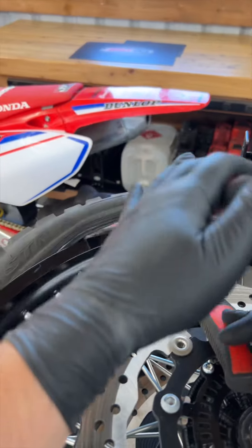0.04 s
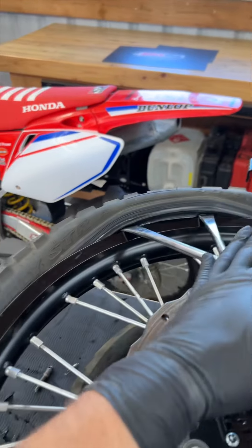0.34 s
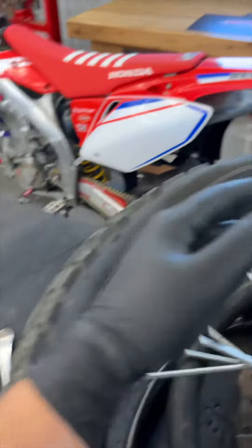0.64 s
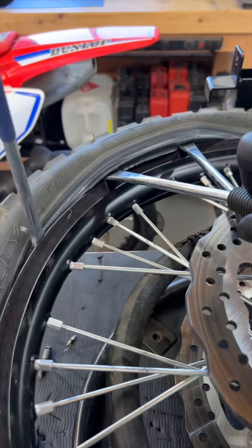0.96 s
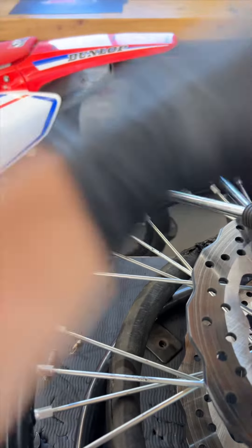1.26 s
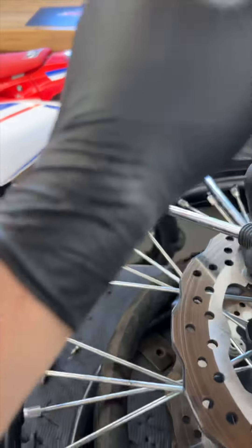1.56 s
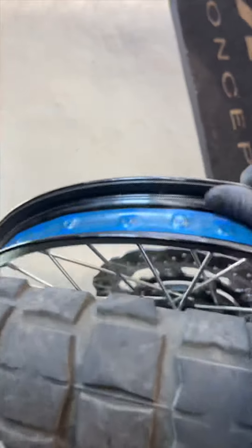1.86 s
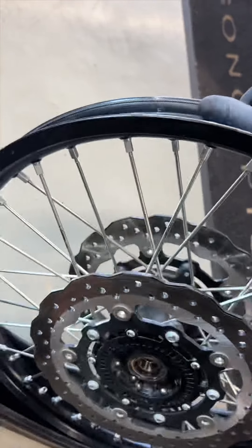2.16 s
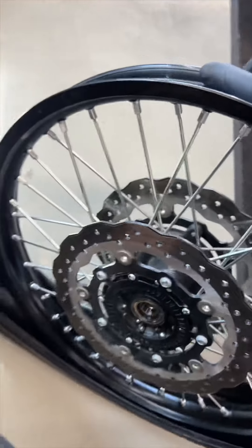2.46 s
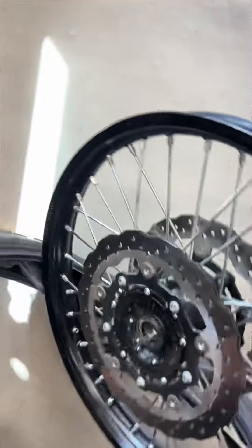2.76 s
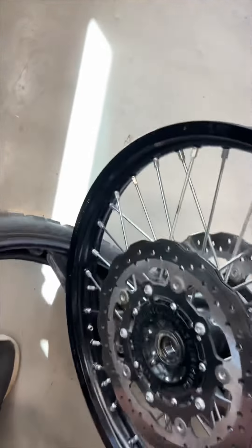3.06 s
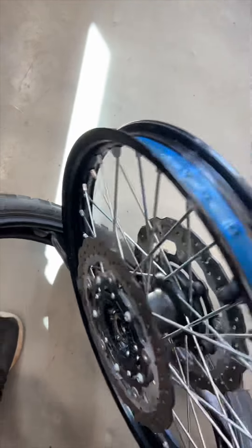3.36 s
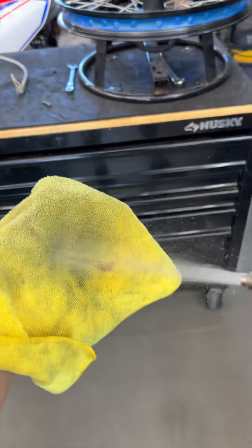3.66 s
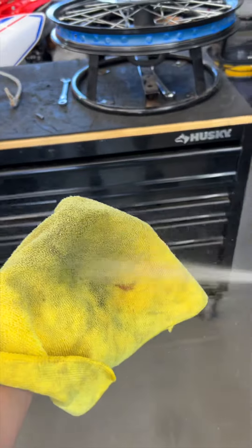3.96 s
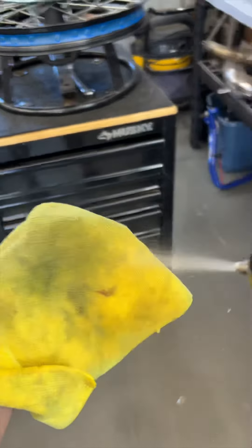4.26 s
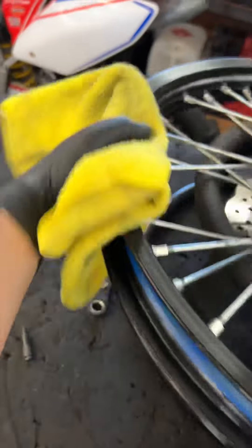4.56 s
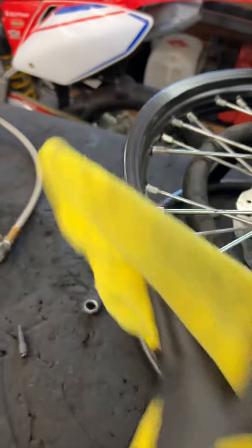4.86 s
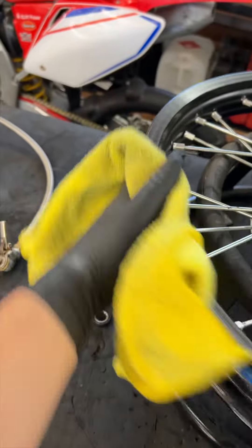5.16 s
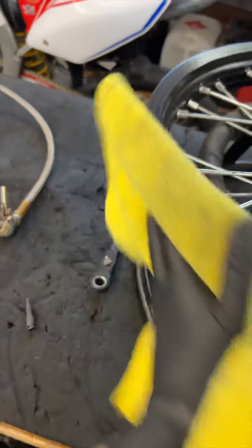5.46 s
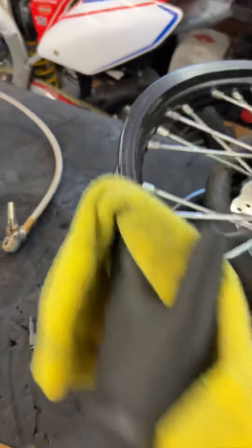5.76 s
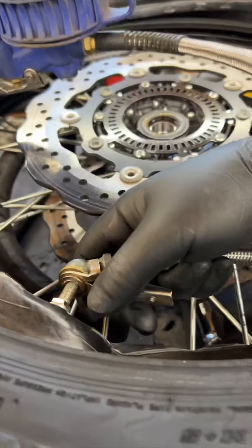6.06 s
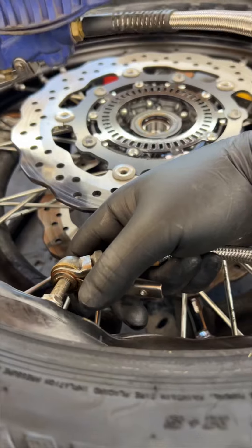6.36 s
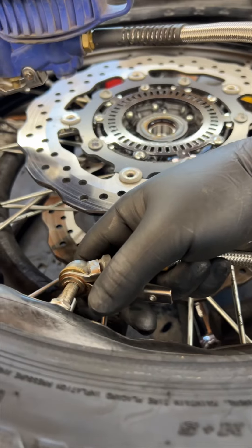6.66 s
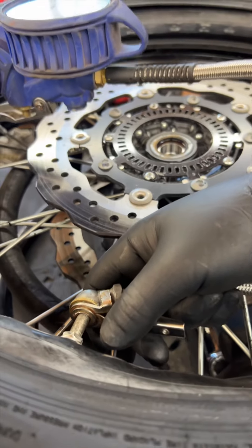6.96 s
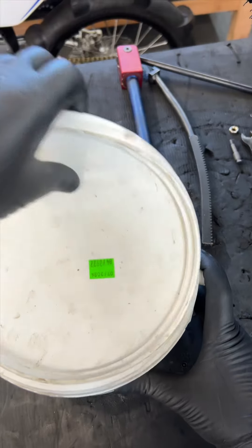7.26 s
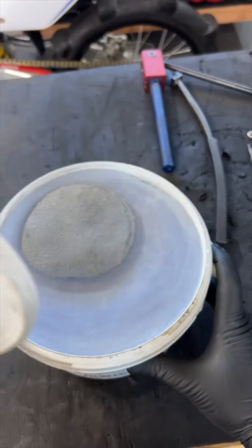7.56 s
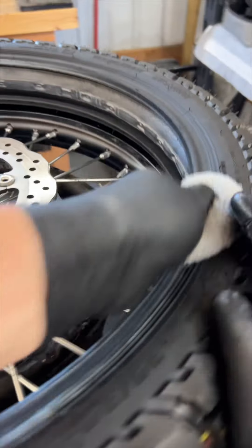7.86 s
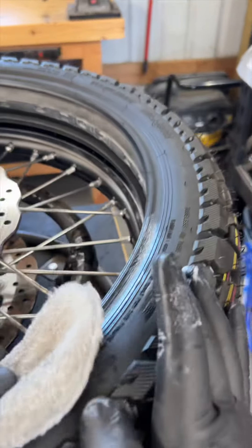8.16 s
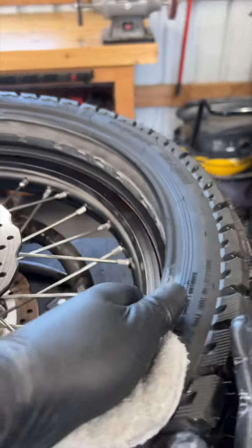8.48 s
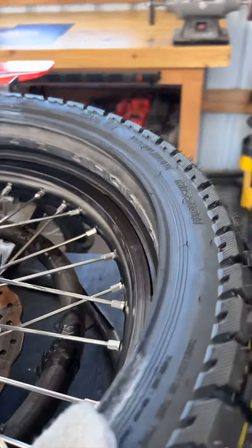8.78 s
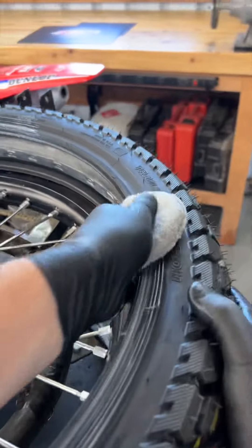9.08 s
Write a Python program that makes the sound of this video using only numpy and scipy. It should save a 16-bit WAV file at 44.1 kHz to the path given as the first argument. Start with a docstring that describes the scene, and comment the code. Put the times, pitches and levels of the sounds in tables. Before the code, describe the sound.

Steel levers clink on a spoked wheel and rubber rubs, then a can sprays, air spits twice and a plastic lid snaps off.

```python
"""Steel levers clink on a spoked wheel as a motorcycle tyre is changed by hand, close to the microphone
in a workshop. The tyre rubs, judders and slaps off the rim; a can sprays a rag that squeaks round the rim.
An air chuck leaks and spits twice, a plastic lid snaps off a tub, and a pad spreads paste round the new
tyre. Bench and floor throw back short echoes, and handling rumbles in the microphone underneath."""
import sys
import numpy as np
from scipy import signal
from scipy.fft import rfft, irfft
from scipy.io import wavfile
from scipy.ndimage import map_coordinates

SR = 44100
rng = np.random.default_rng(int(sys.argv[2]) if len(sys.argv) > 2 else 0)


def wav_record(signal):
    """Record a signal, one row per channel, as 16-bit PCM in the file named by sys.argv[1]."""
    frames = np.transpose(np.atleast_2d(signal))
    bounded = np.clip(frames, -1, 1)
    # unit amplitude maps onto the largest positive 16-bit level
    quanta = np.round(bounded * 32767).astype(np.int16)
    wavfile.write(sys.argv[1], SR, quanta)


N = 402191
TIME = np.arange(N) / SR

# Modes of the brake disc, the spoked wheel and the rag-damped rim: (frequency [Hz], level [dB], t60 [s])
DISC_MODES = [(290, -23, .4), (1464, -17, .24), (1830, -12, .2), (2110, -12, .36), (2380, -13, .36),
              (2821, -10, .2), (3052, -9, .2), (4081, -7, .17), (4393, -14, .25), (5179, 0, .16),
              (5475, -8, .2), (6315, -12, .2), (7311, -12, .19), (9150, -15, .18), (13500, -14, .17)]
WHEEL_MODES = [(242, -11, .8), (441, -21, .8), (818, -21, .6), (1028, -12, .7), (1615, -13, .7),
               (1680, 0, .11), (2094, -6, .28), (2358, -7, .27), (2665, -9, .35), (2789, -8, .18),
               (3252, -8, .22), (3601, -10, .2), (5195, -20, .4), (7640, -18, .13), (8242, -28, .3)]
RIM_MODES = [(1350, -3, .12), (1615, 1, .3), (1810, 1, .2), (2070, -3, .16), (2420, -6, .14),
             (2681, -5, .16), (5489, -8, .18)]
# Moving air at the microphone: (time [s], relative level [dB])
AIR_SWAY = [(0.0, -45), (1.07, -44), (1.25, -25), (1.5, -41), (1.72, -40), (1.87, -31), (2.3, -28),
            (2.48, -37), (2.87, -30), (3.22, -35), (3.6, -47), (5.87, -43), (6.4, -60), (7.4, -38),
            (7.66, -42), (7.92, -26), (8.36, -30), (9.12, -46)]


def amp(db):
    """Decibels to gain."""
    return 10 ** (np.asarray(db) / 20)


def unit_rms(x):
    """The signal scaled to an rms of one."""
    return x / np.sqrt(np.mean(x ** 2) + 1e-20)


def value_at(points, hz):
    """Points joined by straight lines on a log frequency axis."""
    f, value = np.transpose(points)
    return np.interp(np.log(hz + 1), np.log(f + 1), value)


def level(rows):
    """Gain over time from a dB curve."""
    return amp(np.interp(TIME, *np.transpose(rows)))


def add(mix, start, sound):
    """Mix a sound in at a time in seconds."""
    part = mix[round(start * SR):][:len(sound)]
    part += sound[:len(part)]


def colour(x, spectrum, size=4096):
    """Minimum-phase filter with the given spectrum."""
    gain_db = np.maximum(value_at(spectrum, abs(np.fft.fftfreq(size, 1 / SR))), -100)
    taps = np.fft.ifft(np.exp(np.conj(signal.hilbert(np.log(amp(gain_db)))))).real
    return signal.oaconvolve(x, taps[:size // 2])[:len(x)]


def band(x, hz, kind):
    """Third-order Butterworth filter."""
    return signal.sosfilt(signal.butter(3, hz, kind, fs=SR, output="sos"), x)


def wander(per_s):
    """A random drift of about unit size."""
    knots = rng.standard_normal(4096)
    return np.interp(TIME * per_s, np.arange(len(knots)), knots)


def uneven_noise(depth_db, per_s):
    """White noise whose level wavers."""
    return rng.standard_normal(N) * amp(depth_db * wander(per_s))


def gesture(start, length, attack_s, release_s, arch_db=0):
    """Gain of one movement: it swells in, gains arch_db by halfway, and dies away."""
    age = TIME - start
    off_centre = 2 * np.clip(age / length, 0, 1) - 1
    rise = .5 + .5 * np.tanh(age / attack_s)
    fade = np.exp(-np.clip((age - length) / release_s, 0, 20))
    return rise * amp(arch_db * (.5 - off_centre ** 2)) * fade


def together(gains):
    """Overlapping movements add in power."""
    return np.sqrt(sum(gain ** 2 for gain in gains))


def ring(modes):
    """Dying sines of a struck object."""
    t = TIME[:SR]
    return sum(amp(db - 60 * t / t60) * np.sin(2 * np.pi * hz * t) * rng.choice([-1, 1])
               for hz, db, t60 in modes)


def crack(decay_s, spectrum):
    """A few milliseconds of rattling contact, flat in spectrum until the body colours it."""
    t = TIME[:SR // 4]
    burst = rng.standard_normal(len(t)) * np.exp(-t / decay_s)
    rattle = irfft(np.exp(1j * np.angle(rfft(burst))), len(t))
    sound = colour(rattle * np.exp(-t / (4 * decay_s)), spectrum)
    return sound / np.linalg.norm(sound) * np.sqrt(SR / 100)  # the energy of 10 ms at unit rms


def room(x, echo_db, tail_db, echo_decay_s=.018):
    """Near echoes off the bench and floor, then the workshop's tail, whose top dies first."""
    # Reverberation of the workshop: (frequency [Hz], t60 [s])
    decay_times = [(100, .35), (500, .4), (1500, .56), (4000, .58), (8000, .47), (15000, .3)]
    taps = rng.choice([-1., 1.], SR) * (rng.random(SR) < .2) * np.minimum(TIME[:SR] / .012, 1)
    hz, t, frames = signal.stft(taps, SR, nperseg=256)
    tail = signal.istft(frames * amp(-60 * t / value_at(decay_times, hz)[:, None]), SR, nperseg=256)[1]
    t = TIME[:len(tail)]
    echoes = rng.standard_normal(len(t)) * (rng.random(len(t)) < .05)
    echoes *= (t > .005) * np.exp(-t / echo_decay_s)
    response = amp(tail_db) * tail / np.linalg.norm(tail) + amp(echo_db) * echoes / np.linalg.norm(echoes)
    return signal.fftconvolve(x, response)[:N]


def workshop_air(sway_trim_db=-2.2, room_tone_db=-82):
    """Air swaying against the microphone, over the room tone of the shop."""
    # Spectra of the moving air and the room tone: (frequency [Hz], level [dB])
    sway_spectrum = [(1, -4), (4.5, 4), (8, -4), (13, -12), (25, -22), (50, -39), (100, -62), (250, -100)]
    tone_spectrum = [(30, 0), (100, -4), (200, -15), (550, -20), (1600, -20), (4300, -23), (7700, -27),
                     (15000, -35)]
    sway_gains = amp(value_at(sway_spectrum, np.fft.rfftfreq(N, 1 / SR)))
    sway = irfft(rfft(rng.standard_normal(N)) * sway_gains, N)
    sway *= amp(sway_trim_db) * level(AIR_SWAY) / np.std(band(sway, [8, 40], "band"))
    room_tone = amp(room_tone_db) * unit_rms(colour(rng.standard_normal(N), tone_spectrum))
    return sway * np.minimum(TIME / .04, 1) + room_tone


def handling_rumble(trim_db=-.5, steady_db=-64.3):
    """Jolts rumble through the bench into the microphone; a softer rumble follows the sway."""
    # Jolts of wheel and bench: (start [s], length [s], relative level [dB])
    jolts = [(.25, .38, -64), (1.211, .03, -46), (1.3, .035, -44), (1.79, .045, -43), (1.88, .36, -54),
             (2.025, .04, -46), (2.635, .05, -49), (2.81, .05, -56), (4.37, .48, -43), (4.5, .09, -37),
             (4.89, .28, -48), (5.23, .46, -54), (5.71, .15, -37), (7.21, .08, -47), (7.377, .025, -35),
             (7.43, .05, -46), (8.4, .07, -52), (8.66, .2, -56)]
    # Their rumble: (frequency [Hz], level [dB])
    spectrum = [(20, -6), (50, 0), (85, -3), (130, -12), (190, -20), (300, -36), (800, -70)]
    rumble = colour(uneven_noise(depth_db=2.5, per_s=40), spectrum)
    rumble *= amp(trim_db) / np.std(band(rumble, [45, 130], "band"))
    steady = amp(steady_db) * unit_rms(level(AIR_SWAY)) ** .7
    surges = [amp(db) * gesture(start, length, attack_s=.006, release_s=.035)
              for start, length, db in jolts]
    return rumble * together([steady] + surges)


def bumping(drive):
    """Noise darkened to the dull body of a bump or a puff of air."""
    # (frequency [Hz], level [dB])
    spectrum = [(70, -14), (135, 0), (200, -10), (300, -10), (400, -23), (600, -34), (1200, -55)]
    return unit_rms(colour(drive, spectrum))


def shoves(trim_db=-.5):
    """Lumpy bumping as the wheel, rag, tub and pad are pushed about."""
    # Pushes: (start [s], length [s], relative level [dB])
    pushes = [(.03, .45, -74), (4.36, .25, -46), (4.465, .04, -42), (4.62, .1, -57), (4.76, .4, -76),
              (5.5, .18, -57), (5.68, .19, -50), (7.18, .11, -56.5), (7.86, .05, -59), (8.8, .04, -62)]
    bumps = amp(trim_db) * bumping(uneven_noise(depth_db=3.5, per_s=50))
    return bumps * together(amp(db) * gesture(start, length, attack_s=.028, release_s=.025)
                            for start, length, db in pushes)


def thumps(decay_s=.005, spoke_db=-7):
    """Rubber and hands knock softly on the wheel and set a spoke ringing."""
    # Knocks: (time [s], level [dB])
    knocks = [(1.511, -59), (1.599, -61), (1.783, -53), (2.694, -47), (7.236, -47), (8.399, -57),
              (8.424, -53), (8.471, -56)]
    # The soft contact: (frequency [Hz], level [dB])
    spectrum = [(60, -8), (170, 0), (350, -7), (700, -10), (1100, -19), (2200, -16), (4000, -28),
                (10000, -50)]
    # The spoke: (frequency [Hz], level [dB], t60 [s])
    spoke_modes = [(2050, 0, .2), (3720, -6, .15)]
    out = np.zeros(N)
    for start, db in knocks:
        add(out, start, amp(db) * (crack(decay_s, spectrum) + amp(spoke_db) * ring(spoke_modes)[:SR // 4]))
    return out + room(out, echo_db=-9, tail_db=-14)


def ticks(decay_s=.0022, ring_db=-31, trim_db=-.8):
    """Light touches of tools, spokes and the spray nozzle that barely stir the brake disc."""
    # Touches: (time [s], relative peak [dB], relative treble [dB])
    touches = [(0.1281, -51, -3), (0.159, -42, -11), (0.1845, -43, -12), (0.2164, -41, -14),
               (0.2379, -43, -8), (0.2668, -35, -14), (0.8454, -53, -13), (0.9428, -39, -20),
               (1.1209, -52, -13), (1.5224, -39, -12), (1.5519, -48, -20), (1.714, -46, -9),
               (1.7404, -37, -14), (1.7514, -44, -18), (3.1794, -49, -10), (3.5224, -42, -3),
               (3.549, -29, -5), (4.3614, -45, -15), (5.7264, -38, -20), (5.842, -39, -19),
               (5.9908, -31, -11), (7.2374, -39, -30), (7.7144, -53, -13), (8.3863, -44, -17)]
    # The light contact: (frequency [Hz], level [dB])
    spectrum = [(300, -28), (1000, -15), (2200, -2), (5800, 0), (9400, -4), (12500, -5), (15000, -14)]
    out = np.zeros(N)
    for start, db, treble_db in touches:
        tick = crack(decay_s, spectrum)
        tick = band(tick, 6000, "low") + amp(treble_db + 9) * band(tick, 6000, "high")
        add(out, start, amp(db + trim_db) * tick / abs(tick).max())
        add(out, start, amp(db + ring_db) * ring(DISC_MODES))
    return out + room(out, echo_db=-8, tail_db=-16)


def rub(strokes, spectrum, attack_s, release_s, grains_per_s, grain_db, slip_db, rim_db=-60):
    """Smooth drag and tiny catches, throbbing as the surface sticks and slips."""
    catches = (rng.random(N) < grains_per_s / SR) * rng.standard_normal(N)
    drive = (rng.standard_normal(N) + amp(grain_db) * unit_rms(catches)) * amp(slip_db * wander(110))
    rim = unit_rms(signal.oaconvolve(drive, ring(RIM_MODES))[:N])
    sound = unit_rms(colour(drive, spectrum)) + amp(rim_db) * rim
    scrape = band(sound, 3500, "low") / np.std(band(sound, [600, 3500], "band"))
    fizz = unit_rms(band(sound, 3500, "high"))
    # A stroke is loudest halfway, where the hand is fastest.
    scrape_gain, fizz_gain = together(
        amp([[scrape_db], [fizz_db]]) * gesture(start, length, attack_s, release_s, arch_db=3)
        for start, length, scrape_db, fizz_db in strokes)
    return scrape * scrape_gain + fizz * fizz_gain


def rubbing():
    """Close friction of glove, tyre, rag, tub lid and paste pad, each with its own grain."""
    # Strokes: (start [s], length [s], low scrape [dB], fizz [dB])
    glove_strokes = [(0.0, .05, -72, -69), (.08, .23, -76, -79), (.33, .1, -83, -82), (.44, .04, -83, -71),
                     (.84, .09, -84, -70), (.96, .08, -80, -71), (1.085, .11, -78, -72),
                     (1.23, .07, -75, -62), (1.565, .05, -68, -68)]
    tyre_strokes = [(1.715, .05, -63, -65), (1.78, .13, -61, -69), (1.96, .18, -64, -65),
                    (2.15, .105, -57, -60), (2.265, .06, -69, -69), (2.355, .11, -61, -67),
                    (2.48, .14, -66, -69), (2.63, .02, -55, -53), (2.73, .15, -65.5, -63),
                    (2.9, .05, -68, -68), (3.02, .07, -63, -68), (3.15, .135, -67.5, -65),
                    (3.33, .18, -78, -78)]
    rag_strokes = [(4.36, .12, -63.5, -66), (4.47, .28, -61, -65), (4.79, .13, -66, -67),
                   (4.93, .11, -74, -72), (5.06, .11, -61.5, -65), (5.19, .14, -74, -77),
                   (5.36, .2, -68, -68), (5.6, .09, -67, -72), (5.722, .1, -57, -62),
                   (5.838, .02, -53, -57)]
    lid_strokes = [(7.14, .04, -61, -76), (7.175, .135, -50, -62), (7.315, .055, -64, -70)]
    pad_strokes = [(7.84, .07, -59, -58.5), (7.985, .09, -62, -58), (8.04, .1, -56, -57),
                   (8.195, .16, -64, -58), (8.38, .12, -63, -63), (8.55, .17, -71.5, -64),
                   (8.775, .35, -59, -58.5)]
    # Spectra of the rubbed surfaces: (frequency [Hz], level [dB])
    glove = [(300, -22), (700, -20), (1300, -9), (3400, -1), (8000, -3), (12500, -3), (15000, -10)]
    tyre = [(180, -44), (300, -14), (532, -15), (714, -4), (928, -8), (1370, -6), (2100, 0), (2730, -11),
            (3860, -12), (5710, -19), (8880, -19), (9960, -26), (13600, -24), (15000, -31)]
    rag = [(200, -25), (450, -12), (700, -12), (1100, -7), (1700, 0), (2400, -7), (4000, -10), (7200, -12),
           (15000, -24)]
    lid = [(150, -37), (250, -7), (318, -2), (513, -20), (569, -12), (815, -1), (1360, -10), (1950, -9),
           (3620, -14), (3940, -19), (7820, -29), (15000, -41)]
    pad = [(180, -40), (300, -10), (452, -15), (627, -10), (841, -11), (2100, 0), (3220, -5), (4930, -6),
           (6200, -9), (7670, -7), (12700, -16), (15000, -21)]
    return (
        rub(glove_strokes, glove, attack_s=.008, release_s=.025, grains_per_s=120, grain_db=-2, slip_db=2.5)
        + rub(tyre_strokes, tyre, attack_s=.014, release_s=.028, grains_per_s=300, grain_db=-5, slip_db=1.8)
        + rub(rag_strokes, rag, attack_s=.016, release_s=.03, grains_per_s=500, grain_db=-6, slip_db=1.5,
              rim_db=-4)
        + rub(lid_strokes, lid, attack_s=.018, release_s=.012, grains_per_s=300, grain_db=-3, slip_db=2.2)
        + rub(pad_strokes, pad, attack_s=.024, release_s=.034, grains_per_s=900, grain_db=-6, slip_db=.9))


def judders(jitter=.02, rim_db=-9):
    """Rubber, rag and pad let go in quick runs of slips, each a snap and a scuff that stir the rim."""
    # Runs of slips: (start [s], length [s], slip rate [1/s], level [dB], roughness [0-1])
    runs = [(2.14, .12, 238, -52, .5), (2.465, .165, 158, -58, .12), (5.705, .18, 203, -54.5, .55),
            (8.05, .1, 260, -55, .6)]
    # The slipping contact: (frequency [Hz], level [dB])
    spectrum = [(400, -30), (720, -9), (1200, -11), (1750, 0), (2200, -1), (2800, -12), (4000, -20),
                (6000, -45)]
    out = np.zeros(N)
    for start, length, per_s, db, rough in runs:
        cycles = np.cumsum(per_s * (1 + jitter * wander(60)[:int(length * SR)])) / SR
        snaps = np.diff(np.floor(cycles), prepend=0)
        scuffs = np.exp(-(cycles % 1) / .17) * rng.standard_normal(len(cycles))
        slips = (1 - rough) * unit_rms(snaps) + rough * unit_rms(scuffs)
        rim = unit_rms(signal.oaconvolve(slips, ring(RIM_MODES))[:len(slips)])
        sound = unit_rms(unit_rms(colour(slips, spectrum)) + amp(rim_db) * rim)
        add(out, start, amp(db) * sound * signal.windows.tukey(len(cycles), .3))
    return out


def rag_squeaks(width_hz=55, per_overtone_db=-3.5):
    """The weave of the rag sings on the rim, rising in pitch as each stroke speeds up."""
    # Squeaks: (start [s], length [s], first pitch [Hz], top pitch [Hz], level [dB])
    squeaks = [(4.75, .18, 820, 1190, -62), (5.05, .16, 780, 950, -64), (5.38, .15, 680, 1130, -64)]
    out = np.zeros(N)
    for start, length, first_hz, top_hz, db in squeaks:
        progress = np.linspace(0, 1, int(length * SR))
        phase = 2 * np.pi * np.cumsum(first_hz + (top_hz - first_hz) * np.sin(1.8 * progress)) / SR
        tone = 0
        for k in range(1, 5):  # higher overtones are fuzzier
            noise = rng.standard_normal(SR) + 1j * rng.standard_normal(SR)
            fuzz = band(noise, k * width_hz, "low")[-len(phase):]
            tone += amp(per_overtone_db * k) * unit_rms((fuzz * np.exp(1j * k * phase)).real)
        add(out, start, amp(db) * unit_rms(tone) * signal.windows.tukey(len(phase), .6))
    return out


def spray_can(sputter_db=1.3, flutter_db=1.6, drift=.025):
    """A sputtering jet; its colour flutters and drifts in pitch as it plays over the rag."""
    # The nozzle held down: (start [s], length [s], level [dB])
    press = (3.556, .772, -36.6)
    # The jet: (frequency [Hz], level [dB])
    spectrum = [(350, -70), (600, -40), (1360, -30), (1630, -30), (2360, -14), (2820, -11), (3370, -13),
                (4080, -2), (4610, 0), (5140, -3), (5820, -13), (7860, -5), (11100, -19), (14200, -19),
                (15800, -28)]
    start, length, db = press
    edges_hz = [20, 3400, 4600, 5600, 7200, 9000, 12000, 18000]
    jet = sum(band(rng.standard_normal(N), pair, "band") * amp(flutter_db * wander(22))
              for pair in zip(edges_hz, edges_hz[1:]))
    jet = unit_rms(colour(jet * amp(sputter_db * wander(180)), spectrum))
    jet = map_coordinates(jet, [np.cumsum(1 + drift * wander(9))], order=3)  # bends the pitch
    jet *= amp(db) * gesture(start, length, attack_s=.016, release_s=.007, arch_db=2.2)
    return jet + room(jet, echo_db=-21, tail_db=-30)


def air_chuck(swell_s=.017, sag_db=10, whistle_hz=2850, whistle_db=-11, puff_db=-47):
    """Air whistles thinly past the seal, then spits with a low puff as the chuck lifts off the valve."""
    # Chuck on the valve: (leak start [s], lift [s], leak [dB], spit length [s], spit [dB])
    presses = [(6.128, 6.2468, -41.5, .022, -14.2), (6.752, 6.8520, -42.5, .016, -14.2)]
    # The escaping air: (frequency [Hz], level [dB])
    leak_spectrum = [(88, -31), (150, -1), (512, -12), (634, -18), (771, -13), (1280, -17), (1680, -8),
                     (2300, -9), (2790, -1), (4120, -6), (4910, -2), (7830, -3), (9520, -8), (12800, -7),
                     (15800, -19)]
    spit_spectrum = [(59, -45), (100, -15), (224, -20), (568, -31), (1300, -12), (2560, -9), (2960, -13),
                     (3510, -7), (4340, -11), (4720, -6.5), (6220, -6), (7060, -2), (9910, -9), (12800, -4),
                     (15800, -14)]
    hiss = unit_rms(colour(uneven_noise(depth_db=.8, per_s=200), leak_spectrum))
    whistle = unit_rms(band(rng.standard_normal(N), [whistle_hz - 130, whistle_hz + 130], "band"))
    leak = unit_rms(hiss + amp(whistle_db) * whistle)
    spit = unit_rms(colour(rng.standard_normal(N), spit_spectrum))
    puff = amp(puff_db) * bumping(rng.standard_normal(N))
    out = np.zeros(N)
    for start, lift, leak_db, length, spit_db in presses:
        swell = 1 - np.exp(-np.maximum(TIME - start, 0) / swell_s)
        out += leak * amp(leak_db) * swell * (TIME < lift)
        emptied = np.clip((TIME - lift) / length, 0, 1)
        gate = np.minimum(np.minimum(emptied, 1 - emptied) / .11, 1)
        out += spit * amp(spit_db - sag_db * emptied ** 2) * gate  # the pressure sags
        out += puff * gesture(lift, length, attack_s=.004, release_s=.015)
    return out + room(out, echo_db=-13, tail_db=-24.5)


def blow(strike, spectrum, modes):
    """A crack, the ringing of what was hit, and the room's answer, mostly to the crack."""
    start, crack_db, decay_s, ring_db, echo_db, tail_db = strike
    hit, ringing = np.zeros((2, N))
    add(hit, start, amp(crack_db) * crack(decay_s, spectrum))
    add(ringing, start, amp(ring_db) * ring(modes))
    return hit + ringing + room(hit + .4 * ringing, echo_db, tail_db)


def lid_snap():
    """The plastic lid snaps free and the hollow tub rings briefly."""
    # The snap: (time [s], crack [dB], crack decay [s], ring [dB], near echoes [dB], room tail [dB])
    snap = (7.3768, -12, .0022, -18.5, -10.5, -17.5)
    # Its crack: (frequency [Hz], level [dB])
    spectrum = [(50, -14), (100, 0), (220, -5), (370, -1), (600, -10), (880, 1), (1150, -5), (1530, 2),
                (2900, -7), (3800, 0), (4700, -8), (7500, -9), (11000, -14), (16000, -19)]
    # The tub: (frequency [Hz], level [dB], t60 [s])
    tub_modes = [(27, 1, .3), (105, -4, .09), (315, -7, .12), (848, 0, .05), (950, -7, .05),
                 (1287, -4, .06), (1500, -2, .045), (2026, -4, .05), (3770, 2, .017), (6630, -9, .02),
                 (7610, -7, .02)]
    return blow(snap, spectrum, tub_modes)


def levers_and_tyre():
    """Steel levers strike close by, ringing disc, wheel and lever; then the tyre slaps off the rim."""
    # Blows: (time [s], crack [dB], crack decay [s], ring [dB], near echoes [dB], room tail [dB])
    clink = (0.4883, -31, .006, -37, -9.5, -18.5)
    knock = (1.2114, -21.7, .003, -37, -13, -14)
    ping = (1.3113, -31, .005, -27.5, -9, -14)
    slap = (2.6396, -28.5, .011, -51, -7, -11)
    # Their cracks: (frequency [Hz], level [dB])
    clink_spectrum = [(70, -40), (130, -17), (300, -17), (700, -20), (1630, -14), (2600, -3), (3800, -8),
                      (4950, 0), (5900, -9), (7900, -8), (10000, -19), (13800, -22), (15000, -40)]
    knock_spectrum = [(88, -34), (150, -4), (468, -15), (1570, -6), (1910, -11), (2360, 1), (2750, -6),
                      (3210, -1), (3970, -18), (6810, -33), (7640, -25), (9630, -41), (15000, -43)]
    ping_spectrum = [(200, -20), (500, -20), (1240, -16), (3270, -8), (3830, -12), (5000, -3), (8500, -10),
                     (11000, -26), (15000, -33)]
    slap_spectrum = [(59, -32), (100, -2), (241, -17), (375, -17), (797, -29), (1240, -10), (1430, -21),
                     (1810, -11), (2630, -20), (3680, -8), (4540, -13), (7510, -18), (15000, -40)]
    # The lever: (frequency [Hz], level [dB], t60 [s])
    lever_modes = [(5173, -4, .26), (5469, -14, .22), (6422, -1, .25), (7989, -26, .17), (9055, -22, .19),
                   (13600, -32, .2)]
    return (blow(clink, clink_spectrum, DISC_MODES) + blow(knock, knock_spectrum, WHEEL_MODES)
            + blow(ping, ping_spectrum, lever_modes) + blow(slap, slap_spectrum, WHEEL_MODES))


def scene():
    """Blows, friction and air jets at one close microphone, over the rumble of handling."""
    blows = levers_and_tyre() + lid_snap()
    friction = rubbing() + judders() + rag_squeaks()
    background = handling_rumble() + shoves() + workshop_air()
    touches = ticks() + thumps()
    jets = air_chuck() + spray_can()
    friction += room(friction, echo_db=-15, tail_db=-23)
    return (background + touches + friction + jets + blows)[None]


def record(dry, cutoff_hz=16100):
    """The recorder clips at full scale, then cuts the highest treble."""
    lowpass = signal.firwin(511, cutoff_hz, window=("kaiser", 9), fs=SR)
    return signal.oaconvolve(np.clip(dry, -1, 1), lowpass[None], "same")


dry = scene()
out = record(dry)
wav_record(out)
```